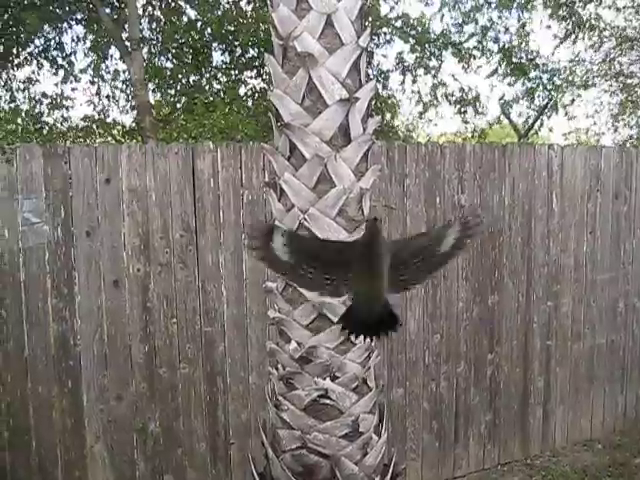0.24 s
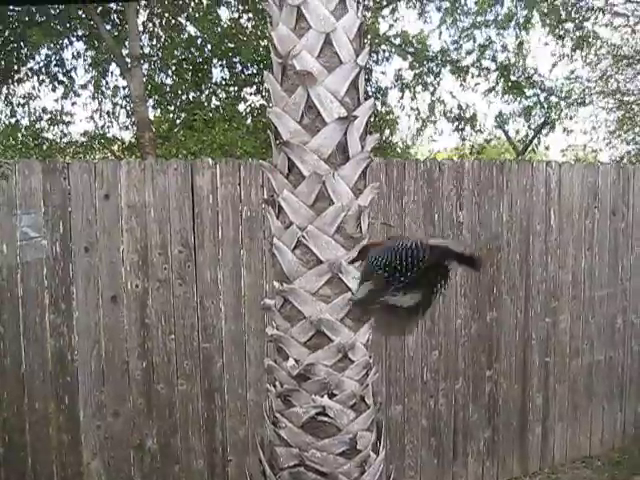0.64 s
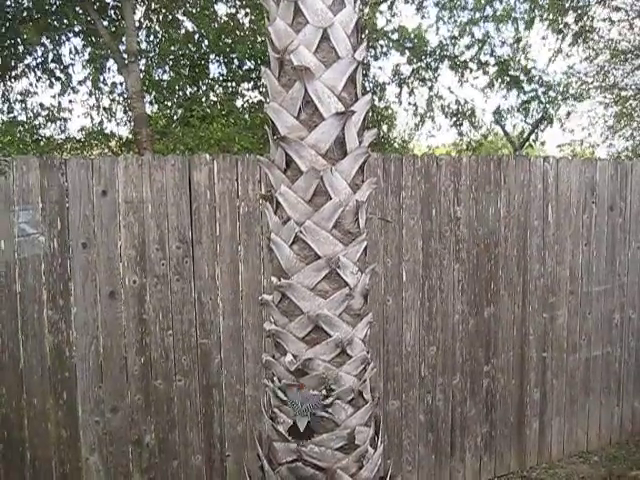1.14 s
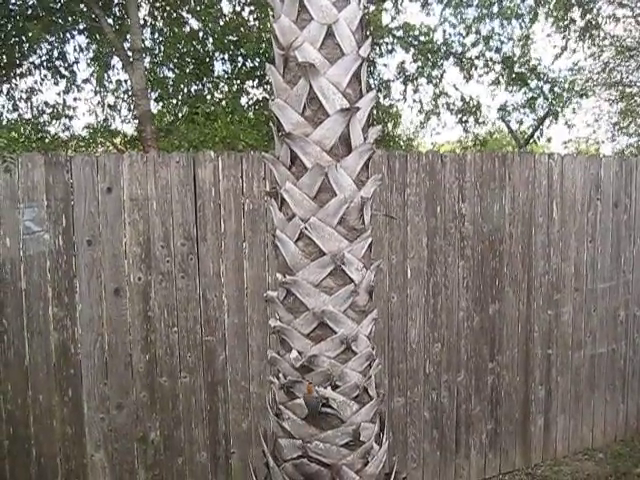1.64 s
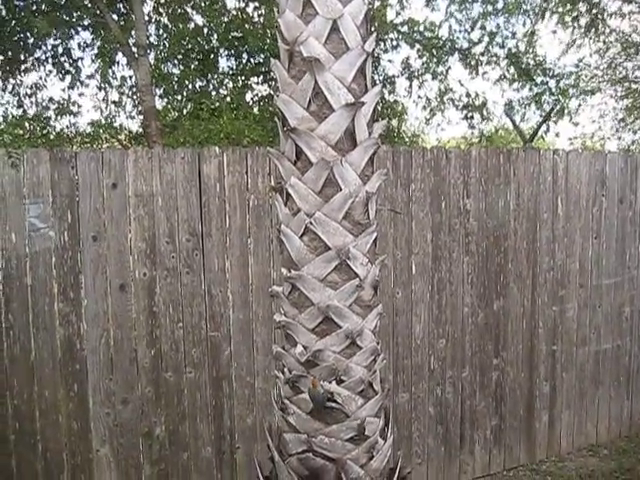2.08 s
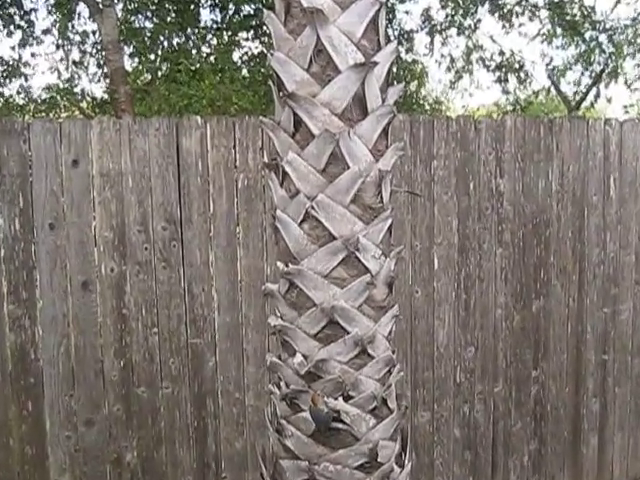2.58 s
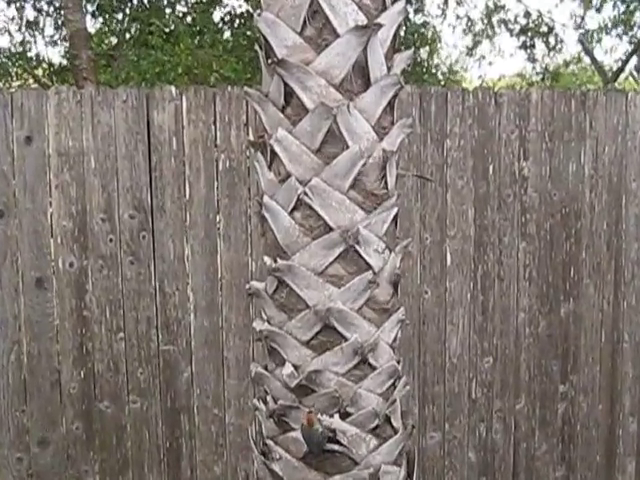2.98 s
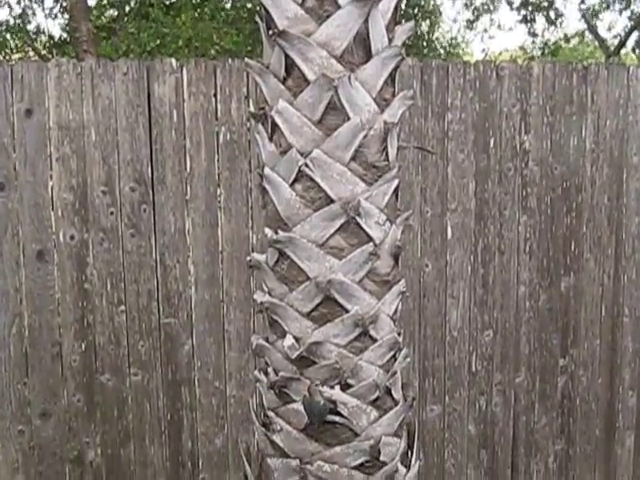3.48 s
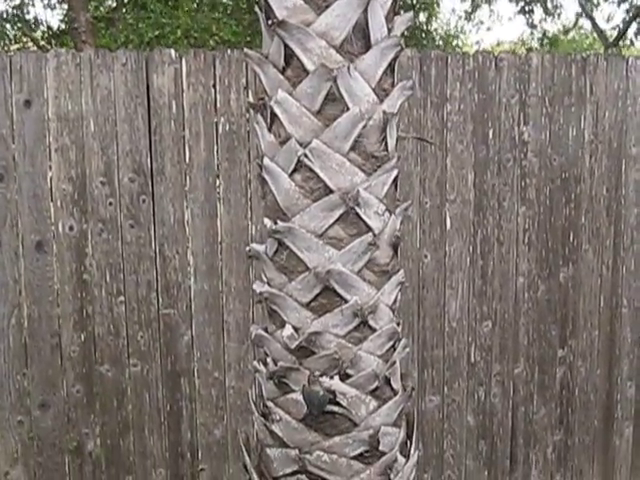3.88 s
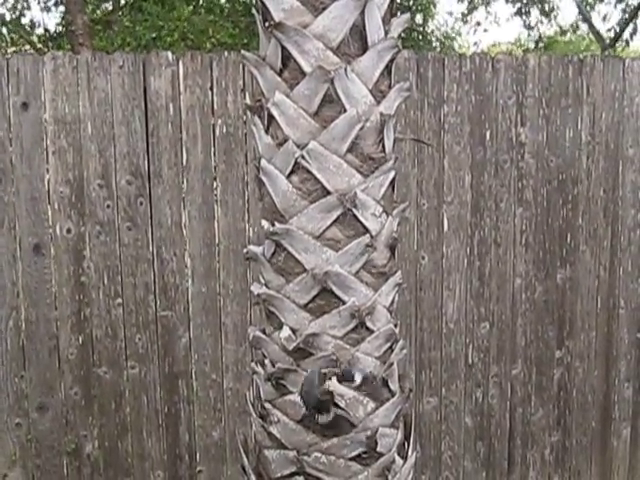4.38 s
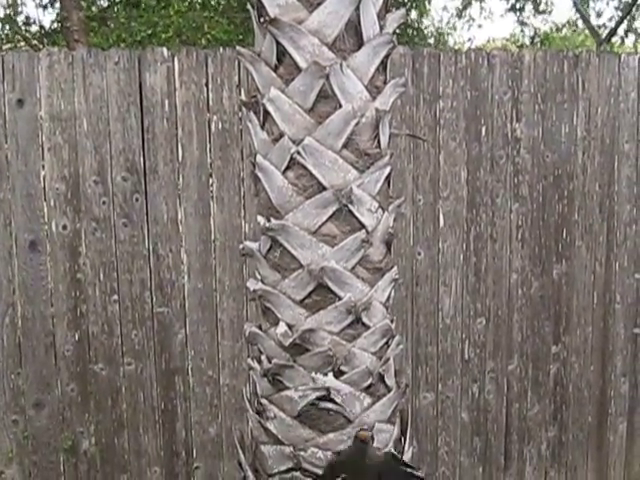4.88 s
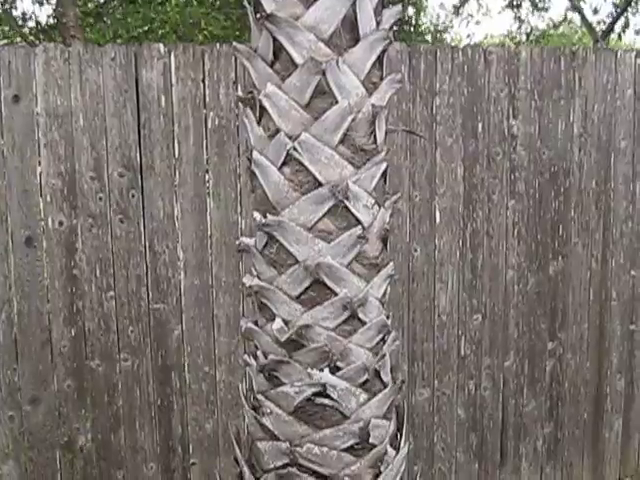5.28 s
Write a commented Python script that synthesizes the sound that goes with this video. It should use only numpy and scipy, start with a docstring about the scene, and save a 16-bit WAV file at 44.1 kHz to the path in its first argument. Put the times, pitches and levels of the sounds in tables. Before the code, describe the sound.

Heard from indoors, a woodpecker pecks at a window close by: a quick cluster of sharp taps and soft wing thumps, then a hard slam that briefly rings the glass. Right at the microphone, a finger rubs and clicks a camera's plastic zoom lever. A few single taps follow, and one last hard blow hits the pane. A faint appliance hum and hiss continue throughout.

```python
"""An appliance hums and hisses indoors as a woodpecker starts pecking at the window close by.
Beak and claws tap, wings beat and the whole bird slams into the pane; each hit makes the glass ring.
Then a finger rubs and clicks a camera's zoom lever, which rings the small plastic case.
The bird comes back with a few more taps and one last hard blow."""
import sys
import numpy as np
from scipy import signal
from scipy.fft import rfft, irfft
from scipy.io import wavfile

SR = 44100
rng = np.random.default_rng(int(sys.argv[2]) if len(sys.argv) > 2 else 0)


def to_wav(s):
    """Save 16-bit WAV."""
    ch = np.atleast_2d(s).T  # columns
    pcm = np.round(np.clip(ch, -1, 1) * 32767)  # PCM
    wavfile.write(sys.argv[1], SR, pcm.astype(np.int16))


N = 243873
TIME = np.arange(N) / SR
TOP_HZ = 15750  # treble above this is cut away

# beak and claws on the glass: (time [s], level [dB], low edge [Hz], high edge [Hz], contact time [s],
# tail boost [dB], pitch of the struck spot [Hz], boost at that pitch [dB])
TAP_HITS = [ (.348, -33.5, 330, 15500, 0.0056, -7.5, 1080, 5.5),
            (.389, -45.5, 450, 8000, 0.0066, -15, 1140, 14),
            (.4678, -37.5, 1400, 15500, 0.0072, -6.5, 3600, 16), (.505, -49, 2300, 4000, .016, -6, 3000, 5),
            (0.799, -35, 2000, 14500, 0.0027, 2, 3050, 8), (.813, -32, 450, 14000, 0.00078, 4, 5570, 6),
            (0.849, -51, 1500, 13000, .0066, 8, 4000, -9), (.857, -32, 980, 14200, .02, 18, 4180, 1),
            (1.161, -42.5, 980, 12000, 0.007, -2, 4500, -1),
            (3.5495, -36, 750, 3700, 0.0075, -5, 1990, 14.5),
            (3.551, -39.5, 746, 1280, 0.016, 4, 990, 14.5),
            (4.085, -45, 2400, 14000, 0.0022, 1, 4430, 10.5), (5.0755, -40, 600, 10400, 0.007, -2, 2300, 9)]
# wing beats on the pane: (time [s], level [dB], high edge [Hz], contact time [s])
WING_BEATS = [(0.64, -31.5, 1400, 0.0083), (.956, -30, 3500, 0.0022), (.987, -35, 1210, 0.023),
              (4.835, -44, 835, .017)]
# the whole bird hits the window: (time [s], thud level [dB], thud contact time [s], thud pitch [Hz],
# crack level [dB], rebound level [dB], rebound high edge [Hz])
BODY_SLAMS = [(.926, -22.5, 0.0019, 540, -19, -32.5, 14100), (5.3895, -24, 0.011, 627, -28.5, -27.5, 4420)]
# ringing tones of the pane and its metal frame: (pitch [Hz], level [dB], ring time [s])
# a ring time, or t60, is how long a sound takes to fade by 60 dB
PANE_TONES = [(311, -14, .35), (440, -8, .28), (544, -10, .22), (620, -5, .08), (770, -6, .2),
              (1066, -9, .13), (1222, -4, .04), (1793, -9, .1), (2160, -11, .12), (2617, -8, .1),
              (2950, -13, .11), (3655, -10, .16), (4050, -11, .1), (4668, -8, .12), (4972, -3, .14),
              (6786, -4, .13), (7116, -1, .15), (8689, -5, .17), (9170, -9, .12), (9520, 2, .1),
              (10370, -10, .12), (10575, -7, .12), (11305, -9, .11), (12080, -1, .11)]
# the window's crowd of weaker tones: (frequency [Hz], level [dB])
WINDOW_SPECTRUM = [(100, 0), (250, 0.5), (500, 1.5), (800, 3), (1000, -1.5), (2000, -3.5), (3000, -3),
                   (5000, -1), (7000, -7.5), (10000, -3), (12500, -5), (16000, -17)]
# how long that crowd rings on in the room: (frequency [Hz], ring time [s])
TAIL_RING_TIMES = [(200, 0.58), (600, 0.17), (1500, 0.21), (4000, 0.17), (10000, 0.26), (16000, 0.13)]
# clicks of the zoom lever: (time [s], level [dB], high edge of the case's ring [Hz], tick vs. ring [dB])
LEVER_CLICKS = [(1.942, -49, 3000, -7), (1.9647, -51, 3000, -2), (2.0324, -44, 3500, -12),
                (2.1860, -48, 2980, -4), (2.1937, -50, 2980, -8), (2.7248, -31, 15200, -21),
                (2.7262, -31, 2040, -15), (3.055, -60, 12000, 12), (3.3311, -23, 1590, -16.5),
                (3.5, -53, 12000, 12)]
# finger strokes on the lever: (start [s], length [s], level [dB])
FINGER_STROKES = [(1.95, 0.098, -47.5), (2.058, 0.14, -47), (2.511, 0.058, -47), (2.687, 0.028, -43),
                  (3.257, 0.024, -49), (3.425, .035, -51)]
# ringing tones of the camera's plastic case: (pitch [Hz], level [dB], ring time [s])
CASE_TONES = [(1072, 3, 0.027), (1384, 8.5, 0.017), (1790, 14.5, 0.0063), (2400, 1, 0.02),
              (3700, 11, 0.0079), (4330, -14, 0.024), (6330, -9, 0.015), (9500, -21, 0.017),
              (12400, -11, .012), (14070, 9.5, 0.0076), (15450, -11, .012)]
# pitches at which the lever itself rings: (pitch [Hz], width [Hz], gain [dB])
LEVER_TONES = [(1914, 140, 23), (4300, 650, 12), (6500, 1100, 9), (9400, 1400, 5), (10600, 1900, 5)]
# tones of the appliance motor: (pitch [Hz], level [dB])
HUM_TONES = [(240, -55.5), (268, -75), (765, -62.5), (807, -60)]
# room air and microphone hiss: (frequency [Hz], relative level [dB])
HISS_SPECTRUM = [(15, -30), (25, -15.5), (209, -16), (240, -10), (289, -11), (433, -13), (552, -12),
                 (598, -12), (782, -12), (1080, -13), (2560, -19.5), (6550, -28.5), (7910, -32),
                 (9300, -29), (15500, -37)]


def taps():
    """Beak and claws strike a new spot each time; such small hard tips barely set the glass ringing."""
    out = np.zeros(N)
    for start, db, low_hz, high_hz, contact_s, tail_db, spot_hz, spot_db in TAP_HITS:
        tap = blow(db, low_hz, high_hz, contact_s,
                   glass_db=-16, tail_db=tail_db, spot_hz=spot_hz, spot_db=spot_db)
        add(out, start, tap)
    return out


def wings():
    """A wing pushes broadly and softly, so the pane's low tones boom."""
    out = np.zeros(N)
    for start, db, high_hz, contact_s in WING_BEATS:
        beat = blow(db, low_hz=318, high_hz=high_hz, contact_s=contact_s,
                    glass_db=6, tail_db=10, spot_hz=765, spot_db=3.5)
        add(out, start, beat)
    return out


def slams(crack_after_s=.0032, rebound_after_s=.0138):
    """The body thuds on the pane, the beak cracks against it, and one rebound leaves it ringing."""
    out = np.zeros(N)
    for start, thud_db, contact_s, thud_hz, crack_db, rebound_db, rebound_hz in BODY_SLAMS:
        thud = blow(thud_db, low_hz=390, high_hz=3280, contact_s=contact_s,
                    glass_db=-26, tail_db=-1, spot_hz=thud_hz, spot_db=9.5)
        crack = blow(crack_db, low_hz=730, high_hz=14500, contact_s=0.0032,
                     glass_db=-3, tail_db=-6, spot_hz=2700, spot_db=4.5)
        rebound = blow(rebound_db, low_hz=330, high_hz=rebound_hz, contact_s=0.0032,
                       glass_db=4, tail_db=3.5, spot_hz=754, spot_db=6)
        add(out, start, thud)
        add(out, start + crack_after_s, crack)
        add(out, start + rebound_after_s, rebound)
    return out


def blow(db, low_hz, high_hz, contact_s, glass_db, tail_db, spot_hz, spot_db):
    """One hit on the window: a crack during contact, then ringing glass and a fading tail."""
    t = np.arange(SR // 2) / SR
    # the force builds early in the contact and lets go at its end
    build = np.minimum(t / (0.34 * contact_s), 1)
    release = fade(np.maximum(t - contact_s, 0), t60=0.051)
    force = grit(t, per_s=2200, share=0.56) * build * release
    # while the bird presses on the pane, its tones die fast and are about equally strong
    held_ring = ring([(hz, -1.1 * np.log2(hz), 0.033) for hz, _, _ in PANE_TONES], t)
    held_pane = signal.fftconvolve(force, held_ring)[:len(t)]
    crack = unit_attack(colour(force, WINDOW_SPECTRUM)) + gain(-3) * unit_attack(held_pane)
    # every spot on the glass shares the blow differently among the tones
    glass = ring([(hz, level + 2 * rng.standard_normal(), t60) for hz, level, t60 in PANE_TONES], t)
    ringing = gain(tail_db - 1.5) * window_tail(t) + gain(glass_db) * unit_attack(glass)
    hit = unit_attack(crack) + build * ringing
    spot = signal.lfilter(*signal.iirpeak(spot_hz, Q=4.9, fs=SR), hit)
    hit = hit + (gain(spot_db) - 1) * spot
    hit = butter(hit, high_hz, "low", order=4)  # soft contacts lack treble
    hit = butter(hit, low_hz, "high")  # light ones barely move the whole pane
    # the sharper the contact, the more of a faint thump leaks into the frame
    thump = gain(-23) * high_hz / TOP_HZ * window_tail(t) * build
    return gain(db) * unit_attack(hit + thump)


def grit(t, per_s, share):
    """A rough contact: noise with a share of its power in tiny separate impacts."""
    impacts = (rng.random(len(t)) < per_s / SR) * rng.choice([-1, 1], len(t))
    return np.sqrt(1 - share) * even_noise(len(t)) + np.sqrt(share) * unit(impacts)


def window_tail(t):
    """Countless tones of window and room blur into fading noise; the bass lasts longest."""
    spectrum = rfft(colour(even_noise(len(t)), WINDOW_SPECTRUM))
    octave = np.log2(np.maximum(np.fft.rfftfreq(len(t), 1 / SR), 1))
    out = 0
    for centre in np.arange(12, 30) / 2:  # half-octave bands from 64 Hz up
        share = np.maximum(1 - 2 * abs(octave - centre), 0)
        band = irfft(spectrum * share, len(t))
        out = out + band * fade(t, value_at(TAIL_RING_TIMES, 2 ** centre))
    return unit_attack(out)


def lever_clicks(snap_s=.0006, chatter_db=-17):
    """The lever snaps against the case; a cushioned stop rings only the case's lowest tones."""
    out, t = np.zeros(N), np.arange(SR // 10) / SR
    case = unit_attack(butter(ring(CASE_TONES, t), 930, "high", order=3))
    for start, db, high_hz, tick_db in LEVER_CLICKS:
        # one clean snap, then the lever chatters briefly in its seat
        snap = np.arange(len(t)) == int(snap_s * SR)
        chatter = gain(chatter_db) * even_noise(len(t)) * (t > snap_s) * fade(t, t60=0.024)
        tick = unit_attack(lever_ring(snap + chatter))
        knock = unit_attack(butter(case, high_hz, "low", order=5))
        add(out, start, gain(db) * unit_attack(knock + gain(tick_db) * tick))
    return out


def lever_rub(slips_per_s=3500, case_db=-6):
    """Skin sticks and slips on the lever: tiny clicks ring the lever and the case."""
    sizes = gain(-4 * np.minimum(rng.exponential(size=N), 4))
    slips = (rng.random(N) < slips_per_s / SR) * rng.standard_normal(N) * sizes
    case = signal.fftconvolve(slips, ring(CASE_TONES, TIME[:SR // 10]))[:N]
    rub = unit(lever_ring(slips)) + gain(case_db) * unit(butter(case, [900, 7000], "band"))
    pressure = sum(gain(db) * finger_pressure(start, length) for start, length, db in FINGER_STROKES)
    return unit(rub) * pressure


def finger_pressure(start, length, grip_s=0.027, swell_db_per_s=17):
    """In one stroke the finger grips, presses ever harder, then lets go."""
    grip = np.clip((TIME - start) / grip_s, 0, 1)
    past_end = TIME - start - length
    swell = gain(swell_db_per_s * np.minimum(past_end, 0))
    return grip * swell * fade(np.clip(past_end, 0, 1), t60=.07)


def lever_ring(force):
    """A force makes the lever ring at its own pitches."""
    rung = sum(gain(db) * signal.lfilter(*signal.iirpeak(hz, hz / width, SR), force)
               for hz, width, db in LEVER_TONES)
    return butter(rung, 13000, "low", order=4)


def hum_and_hiss(hiss_db=-48.5, waver_db=0.8, waver_hz=10, slowing_per_s=.003):
    """The air hisses steadily while an appliance motor hums, wavering and slowing very slightly."""
    speed = 1 - slowing_per_s * (TIME - TIME.mean())
    motor_time = np.cumsum(speed) / SR
    out = gain(hiss_db) * unit(colour(rng.standard_normal(N), HISS_SPECTRUM))
    for hz, db in HUM_TONES:
        waver = unit(butter(rng.standard_normal(N), waver_hz, "low"))
        tone = np.sqrt(2) * np.sin(2 * np.pi * (hz * motor_time + rng.random()))
        out = out + gain(db - waver_db * waver) * tone
    return out


def gain(db):
    """Turn decibels into a multiplier."""
    return 10 ** (np.asarray(db) / 20)


def unit(x):
    """Scale to an average (rms) strength of 1."""
    return x / np.sqrt(np.mean(x ** 2))


def unit_attack(x):
    """Scale a hit to an average strength of 1 over its first 20 ms."""
    return x / np.sqrt(np.mean(x[:SR // 50] ** 2))


def value_at(points, hz):
    """Read between (frequency, value) points, spaced by octaves."""
    frequencies, values = np.transpose(points)
    return np.interp(np.log(np.maximum(hz, 1)), np.log(frequencies), values)


def butter(x, hz, kind, order=2):
    """Keep the lows, the highs or a band; a higher order cuts more steeply."""
    return signal.sosfilt(signal.butter(order, np.minimum(hz, SR / 2 - 1), kind, fs=SR, output="sos"), x)


def colour(x, points):
    """Shape the bass and treble of x with (frequency [Hz], level [dB]) points."""
    frequencies = np.fft.rfftfreq(len(x), 1 / SR)
    return irfft(rfft(x) * gain(value_at(points, frequencies)), len(x))


def fade(t, t60):
    """Die away by 60 dB every t60 seconds."""
    return np.exp(-np.log(1000) * t / t60)


def ring(tones, t):
    """The fading tones of a struck object."""
    return sum(gain(db) * fade(t, t60) * np.cos(2 * np.pi * hz * t) for hz, db, t60 in tones)


def even_noise(size):
    """Noise that is equally strong at every frequency."""
    return unit(irfft(np.exp(2j * np.pi * rng.random(size // 2 + 1)), size))


def add(out, start, x):
    """Mix x into out at start seconds."""
    i = int(start * SR)
    out[i:i + len(x)] += x[:N - i]


def scene():
    """Bird, camera and room together in one channel."""
    return (taps() + wings() + slams() + lever_clicks() + lever_rub() + hum_and_hiss())[None]


def record(dry, dip_hz=7930, dip_db=-19):
    """The microphone has a deep, narrow dip in the treble, and the very top is cut off."""
    dipped = dry
    for _ in range(2):  # half of the dip each time
        notched = signal.lfilter(*signal.iirnotch(dip_hz, Q=8, fs=SR), dipped)
        dipped = notched + gain(dip_db / 2) * (dipped - notched)
    return signal.sosfilt(signal.ellip(10, .2, 70, TOP_HZ, fs=SR, output="sos"), dipped)


dry = scene()
out = record(dry)
to_wav(out)
```